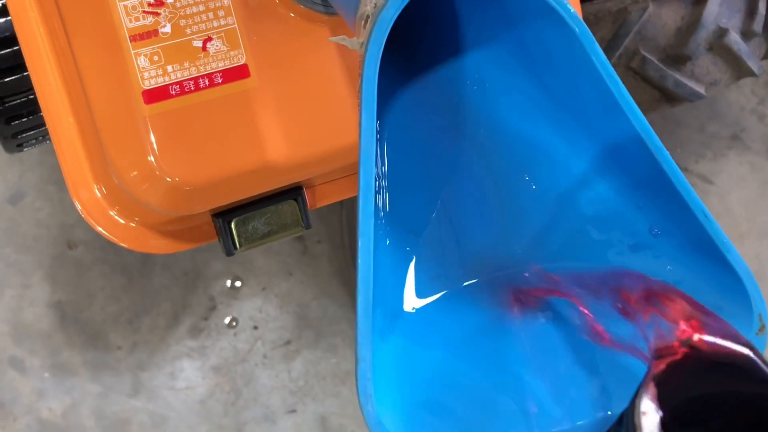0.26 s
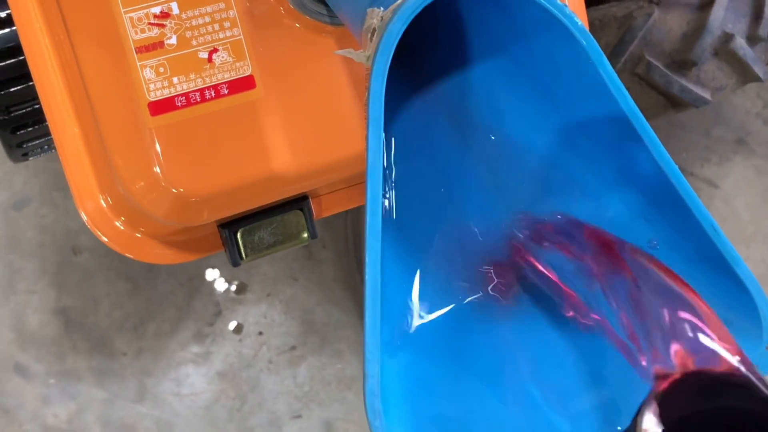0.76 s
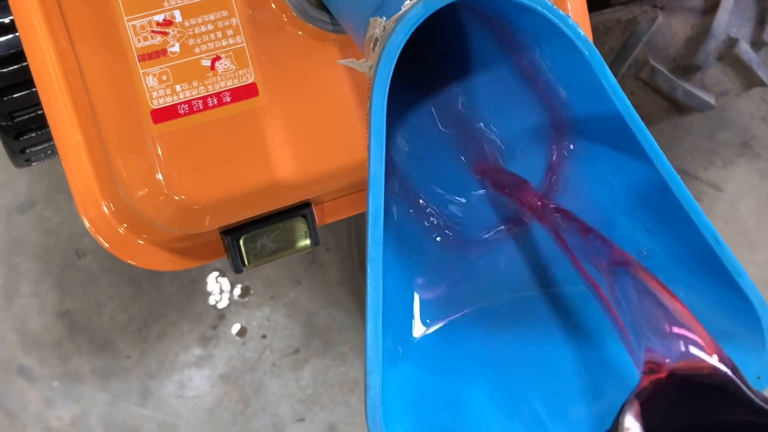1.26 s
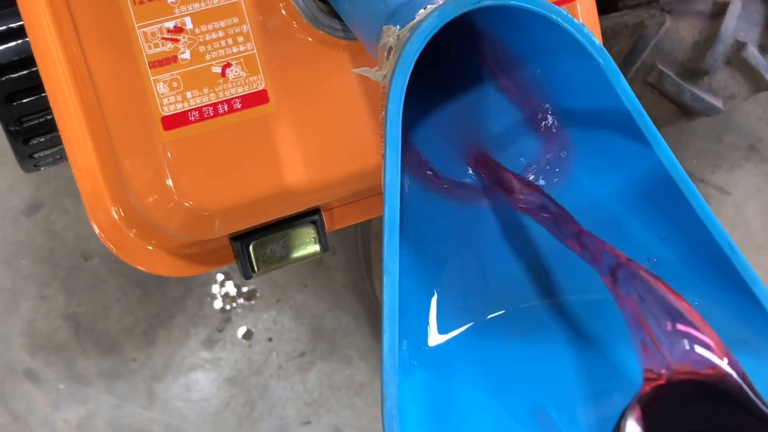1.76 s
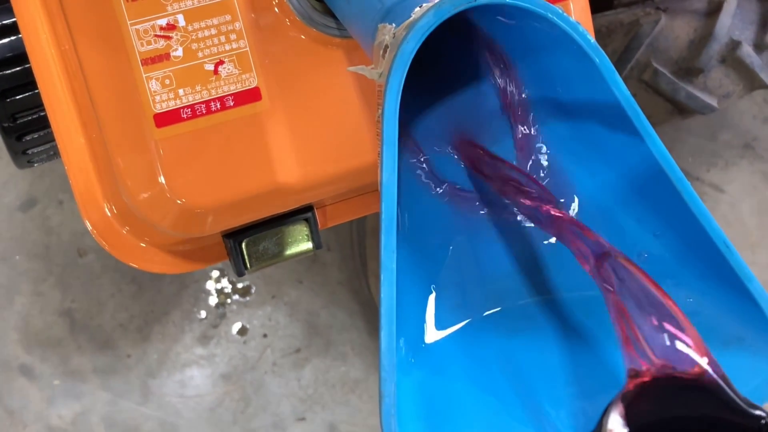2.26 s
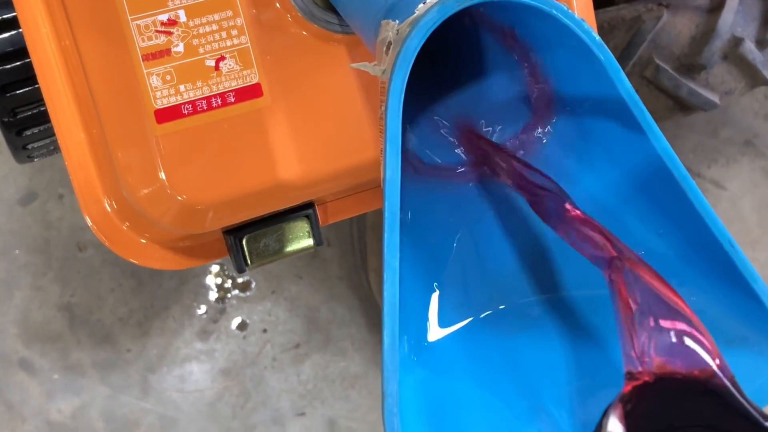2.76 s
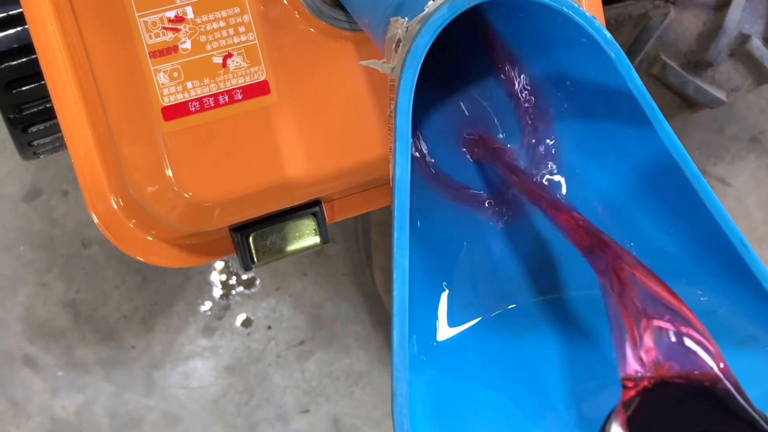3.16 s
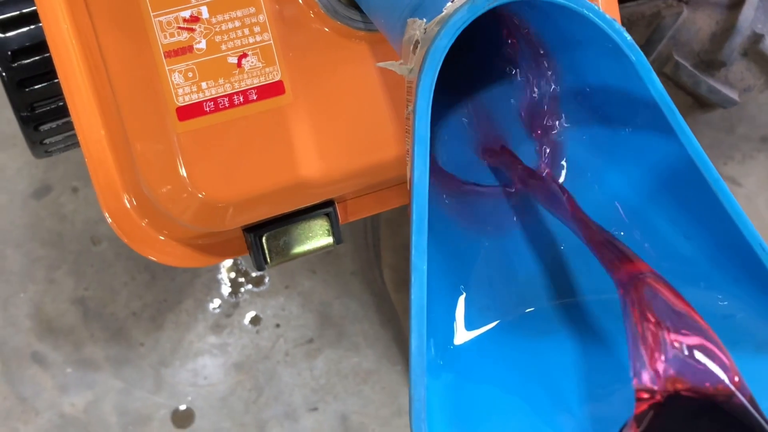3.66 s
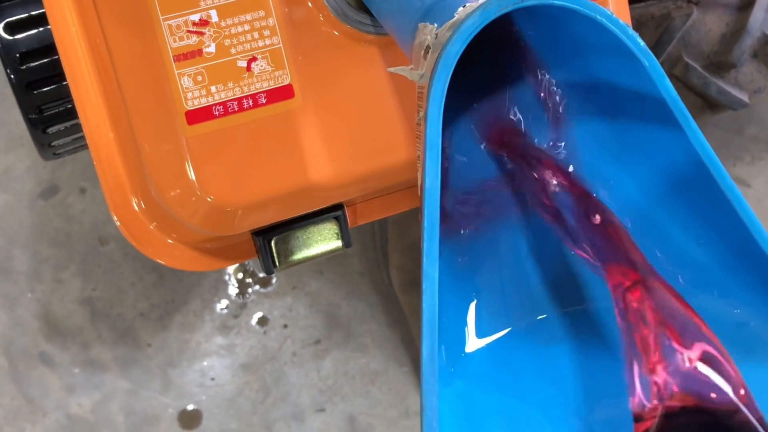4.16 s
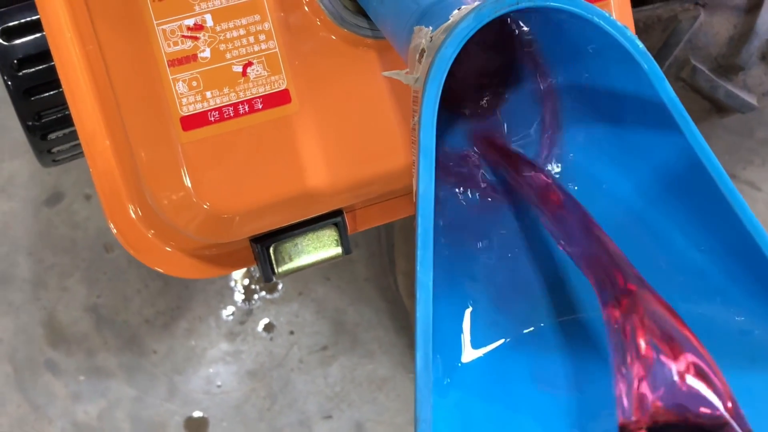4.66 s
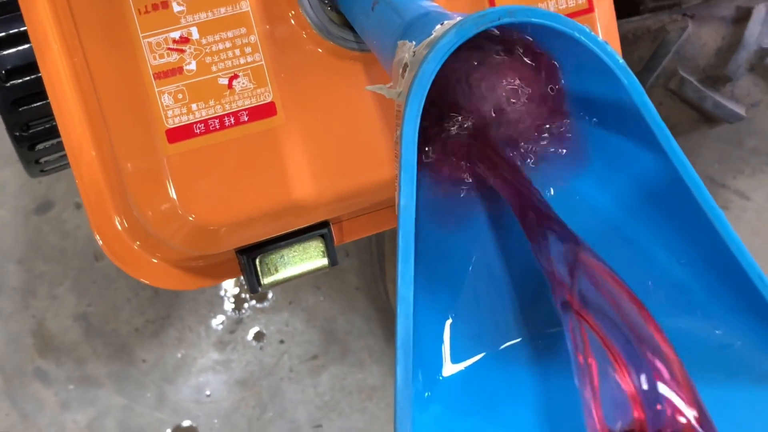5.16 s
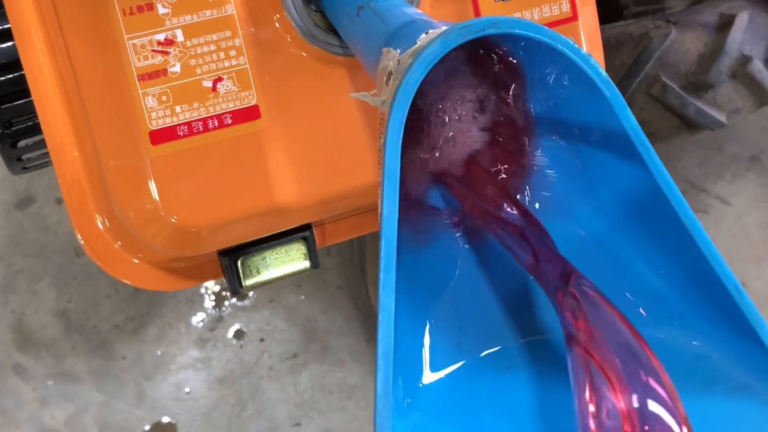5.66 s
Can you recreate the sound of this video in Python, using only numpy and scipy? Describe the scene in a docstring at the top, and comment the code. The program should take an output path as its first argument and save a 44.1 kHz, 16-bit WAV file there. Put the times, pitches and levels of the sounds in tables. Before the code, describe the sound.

Fuel is poured into a plastic funnel on an engine's tank, heard very close in a quiet workshop with a short, soft reverberation. At first there is only faint low room air, with tiny ticks and a weak spurt near 0.3 s, a small upward chirp of a drop around 0.5 s and another light spatter near 0.8 s. From about 1.1 s, separate gushes bring wet, hollow plops and gurgles, strongest from 1.6 to 3 s, the neck's resonance creeping upward, with sharp drops tapping plastic. Around 3.3 s the gushes merge into a continuous, brighter rush of fine splashes and bubbles, fullest until about 5 s, while the hollow ring fades. Then it softens unevenly into fizzing, crackling foam to the end at 5.9 s. Behind it, a low wavering engine-like hum swells from 3 s, peaks around 4.4 s with its pitch rising and falling, then eases.

```python
"""Fuel poured through a funnel

Fuel runs from a can into a plastic funnel on an engine's tank, close by, in a workshop.
A few small gushes come first; then the stream plops in the neck, thickens to a rush and ends in foam.
Trapped bubbles are decaying sines, droplets are noise ticks, and the cone, neck and tank filter them.
Behind, a low hum like an engine some way off swells as a wavering harmonic series, over still air."""
import sys
import numpy as np
from scipy import signal
from scipy.fft import rfft, irfft, next_fast_len
from scipy.io import wavfile
from scipy.ndimage import uniform_filter1d

SR = 44100
rng = np.random.default_rng(int(sys.argv[2]) if len(sys.argv) > 2 else 0)


def wav_record(signal):
    """Record a signal, one row per channel, as 16-bit PCM in the file named by sys.argv[1]."""
    frames = np.transpose(np.atleast_2d(signal))
    bounded = np.clip(frames, -1, 1)
    # unit amplitude maps onto the largest positive 16-bit level
    quanta = np.round(bounded * 32767).astype(np.int16)
    wavfile.write(sys.argv[1], SR, quanta)


N = 260554
TIME = np.arange(N) / SR

# the loudest air bubbles trapped by the stream: peak_s (moment when the bubble is loudest),
# level_db (relative), pitch_hz, ring_cycles (relative decay time, in periods)
BUBBLES = [(0.5986, -36, 7070, 16), (1.043, -41, 2330, 1.9), (1.1143, -32, 4100, 4.4),
           (1.1538, -39, 1550, 3.3), (1.173, -41.5, 1590, 4.5), (1.2925, -36.5, 3490, 4.7),
           (1.3575, -29.5, 4900, 7.8), (1.3857, -26.5, 1420, 2.8), (1.4404, -33.5, 1160, 3.4),
           (1.4458, -27, 1950, 1.8), (1.632, -29.5, 5470, 14), (1.634, -22.5, 2240, 2),
           (1.635, -23.5, 1150, 3.8), (1.6486, -31, 5500, 7.7), (1.681, -33, 1850, 1.8),
           (1.7111, -25, 1263, 6.5), (1.726, -28, 1930, 0.59), (1.7638, -25, 1286, 1.8),
           (1.834, -30.5, 4050, 14), (1.8473, -26.5, 1630, 1.76), (1.8644, -23.5, 4530, 0.96),
           (1.8678, -38, 1030, 5.7), (2.033, -25.5, 1970, 2.5), (2.0698, -21.5, 1666, 2.1),
           (2.0754, -25, 1335, 4.5), (2.101, -33.5, 4950, 5.5), (2.13, -33, 6330, 15),
           (2.162, -35, 10200, 6.5), (2.142, -29.5, 1490, 6.9), (2.235, -28, 1610, 6.4),
           (2.2933, -35.5, 1310, 3.3), (2.3085, -30, 1150, 2.6), (2.3236, -32.5, 5800, 8.1),
           (2.365, -28.5, 1074, 4.9), (2.453, -32.5, 3630, 2.8), (2.4728, -37, 1870, 1.2),
           (2.512, -36, 1540, 7.1), (2.539, -32, 1900, 3), (2.578, -27.5, 1310, 3.7),
           (2.7001, -24, 1830, 1.1), (2.7325, -31, 4000, 10), (2.7326, -28, 11800, 6.9),
           (2.7479, -24.5, 5100, 2.2), (2.7784, -31, 1370, 1.4), (2.8243, -29.5, 1550, 1.8),
           (2.9128, -21.5, 1140, 3.2), (2.9494, -21.5, 4430, 6.6), (2.9691, -23, 4420, 14),
           (2.981, -28, 4750, 11), (3.004, -30.5, 1214, 4.4), (3.026, -34, 4830, 6.1),
           (3.0847, -34, 4830, 4.4), (3.1309, -32, 5300, 7.6), (3.1847, -27.5, 1740, 5.4),
           (3.195, -26, 1410, 3.8), (3.26, -24.5, 2020, 1.3), (3.2768, -33, 1390, 3),
           (3.2966, -23.5, 7800, 4.5), (3.3142, -30.5, 1950, 1.7), (3.3803, -30.5, 4800, 21),
           (3.4219, -30, 1340, 4.7), (3.449, -34, 1580, 1.8), (3.504, -22.5, 1980, 1.4),
           (3.5338, -32, 1580, 1.5), (3.5508, -25, 1180, 1), (3.733, -29.5, 1240, 1.5),
           (3.766, -24.5, 11500, 2.3), (3.852, -31, 1920, 1.3), (3.877, -29, 10540, 20),
           (3.9229, -29, 8300, 14), (3.9613, -22.5, 1460, 3), (4.0005, -24, 4800, 2.4),
           (4.0477, -21.5, 1860, 4.2), (4.175, -36, 1400, 3.4), (4.2132, -28.5, 2030, 1.2),
           (4.2251, -30.5, 1500, 2.5), (4.276, -25.5, 1750, 0.83), (4.311, -27, 1580, 1),
           (4.332, -30.5, 1770, 4.1), (4.383, -28.5, 8400, 11), (4.4505, -38, 1800, 2),
           (4.5852, -23.5, 11580, 7.9), (4.6134, -25.5, 5130, 2.7), (4.8094, -27.5, 11310, 11),
           (4.849, -35.5, 1530, 3.6), (4.939, -29, 11740, 4.8), (4.9464, -30.5, 4196, 3.6),
           (5.0224, -31, 1850, 1.3), (5.0853, -28, 3550, 2.06), (5.119, -33.5, 1657, 1.8),
           (5.1763, -37.5, 5800, 8.8), (5.238, -37, 1500, 1.3), (5.365, -35, 1420, 1.9),
           (5.387, -29.5, 12300, 9.6), (5.39, -31, 1960, 0.99), (5.4547, -30, 5870, 5.6),
           (5.4911, -29.5, 1350, 1.3), (5.5433, -28.5, 5200, 0.88), (5.63, -35.5, 1860, 2.2)]
# how finely the stream breaks up: time_s, density (relative)
DENSITY = [(0, .7), (1.2, .8), (2.6, .8), (3.3, 1.1), (4.2, 2), (5, 2.2), (5.91, 2.4)]
# the air in the funnel's neck, which rings once fuel runs down it and is choked as the fuel
# backs up: time_s, resonance_hz (before its wavering), ring_db (relative)
NECK = [(0, 766, -12), (.9, 774, -6), (1.25, 812, 4), (1.65, 898, 7), (1.9, 948, 5), (2.9, 1010, 2),
        (3.8, 1040, -9), (4.8, 1047, -19), (5.91, 1070, -10)]


def amp(db):
    """Decibels to amplitude ratio."""
    return 10 ** (np.asarray(db) / 20)


def evened(x):
    """Normalizes a signal to an rms of 1."""
    return x / np.sqrt(np.mean(x ** 2) + 1e-20)


def curve(rows, axis=1):
    """Piecewise-linear interpolation of one table column over time."""
    rows = np.array(rows)
    return np.interp(TIME, rows[:, 0], rows[:, axis])


def read(points, hz):
    """Interpolates a spectrum linearly over log frequency."""
    f, value = np.transpose(points)
    return np.interp(np.log(hz + 1), np.log(f), value)


def add(mix, s, sound):
    """Superposes a sound on the mix at a time in seconds."""
    part = mix[max(round(s * SR), 0):][:len(sound)]
    part += sound[:len(part)]


def noise(points):
    """Stationary noise: a white spectrum weighted by the given one, at rms 1."""
    size = next_fast_len(N, True)
    white = rfft(rng.standard_normal(size))
    gain = amp(read(points, np.fft.rfftfreq(size, 1 / SR)))
    return evened(irfft(white * gain, size)[:N])


def drift(hz, size=8192):
    """Slow random fluctuation of rms 1: noise under a Gaussian low-pass."""
    low_pass = np.exp(-(np.fft.rfftfreq(size, N / SR / size) / hz) ** 2)
    slow = irfft(rfft(rng.standard_normal(size)) * low_pass, size)
    return evened(np.interp(TIME, np.linspace(0, N / SR, size), slow))


def colour(x, points, size=2048):
    """Minimum-phase filtering: the Hilbert relation makes each click ring only after it."""
    log_gain = np.log(amp(read(points, abs(np.fft.fftfreq(size, 1 / SR)))))
    impulse = np.fft.ifft(np.exp(np.conj(signal.hilbert(log_gain)))).real
    return signal.oaconvolve(x, impulse[:size // 2])[:N]


def resonate(x, hz, width):
    """A moving resonance of gain 1: heterodyne to zero, one-pole low-pass, and back."""
    turn = np.exp(2j * np.pi * np.cumsum(hz) / SR)
    r = np.exp(-np.pi * width / SR)
    return 2 * (turn * signal.lfilter([1 - r], [1, -r], x / turn + 1e-18)).real


def ring(x, hz, width):
    """A fixed two-pole resonance of gain 1."""
    hz, width = min(hz, .42 * SR), min(width, SR / 4)
    return signal.lfilter(*signal.iirpeak(hz, hz / width, fs=SR), x)


def still_air(level_db=-56.5):
    """Room tone: stationary noise with most of its power at low frequencies."""
    # the workshop at rest: frequency_hz, density_db (per Hz, relative)
    air_spectrum = [(15, -61), (25, -52), (45, -1), (102, -2.5), (206, -5.5), (263, -11), (363, -14.5),
                    (641, -24), (1200, -27), (1440, -23.5), (2000, -33.5), (4300, -41), (5100, -34),
                    (6200, -41.5), (11000, -45.5), (13300, -40), (16000, -40)]
    return amp(level_db) * noise(air_spectrum)


def engine(waver=0.014, flutter_db=3.0, load=0.91, rumble_db=-4):
    """A frequency-modulated harmonic series whose overtones grow with load, over a rumble."""
    # the distant engine: time_s, firing_hz (before its wavering), level_db (relative)
    course = [(0, 48.3, -70), (2.5, 47, -70), (2.95, 47.75, -60), (3.25, 51.7, -55), (3.48, 58, -49),
              (3.75, 60.63, -53), (3.97, 50.7, -51.5), (4.2, 55.4, -51.5), (4.38, 57.38, -46),
              (4.76, 57.7, -48), (5, 55.04, -50.5), (5.3, 48.37, -51), (5.91, 49.1, -55)]
    # its harmonics under load: multiple (of firing rate), level_db (relative)
    orders = [(1, 1), (2, 2), (3, -11.5), (4, -8), (5, -16.5)]
    # the engine's rumble: frequency_hz, density_db (per Hz, relative)
    rumble_spectrum = [(15, -52), (26, -32), (42, 2), (95, 1), (140, -9), (220, -3.5), (330, -15.5),
                       (600, -14.5), (1200, -14), (4000, -68)]
    turns = np.cumsum(curve(course) * (1 + waver * drift(8.4))) / SR
    level = curve(course, axis=2)
    overtones_db = load * (level - level.max())
    hum = np.zeros(N)
    for k, db in orders:
        order_db = db + (k > 1) * overtones_db + flutter_db * drift(18.5)
        hum += amp(order_db) * np.sin(2 * np.pi * (k * turns + rng.random()))
    return amp(level) * (hum + amp(rumble_db) * noise(rumble_spectrum))


def workshop(x, wall_db=-17, wall_s=0.0021, room_db=-19):
    """Early reflections inside the cone, then the room's frequency-dependent reverberant decay."""
    # ring of the room: frequency_hz, t60_s
    reverberation = [(300, 1), (1500, 0.35), (5000, 0.34), (15000, 0.35)]
    t = TIME[:SR // 2]
    # sparse random echoes of either sign
    near, far = rng.choice([-1., 1.], (2, len(t))) * (rng.random((2, len(t))) < .1)
    near *= np.exp(-t / wall_s) * (t > .001)
    hz, age, z = signal.stft(far * (t > .006), SR, nperseg=256)
    decay = amp(-60 * age / read(reverberation, hz)[:, None])
    tail = signal.istft(z * decay, SR, nperseg=256)[1][:len(t)]
    echoes = amp(wall_db) * near / np.linalg.norm(near) + amp(room_db) * tail / np.linalg.norm(tail)
    return x + signal.oaconvolve(x, echoes)[:N]


def tank(wet, cavity_hz=420, level_db=-4):
    """Cavity resonance: fuel falling inside stirs the tank's hollow in step with the splashing."""
    strength = np.sqrt(abs(uniform_filter1d(wet ** 2, size=900)) + 1e-16)
    stirred = strength * rng.standard_normal(N)
    return amp(level_db) * ring(ring(stirred, cavity_hz, 85), cavity_hz, 180)


def neck(wet):
    """Sympathetic resonance of the neck's air; swirling fuel alters the gap, and so the pitch."""
    hz = curve(NECK) * (1 + 0.031 * drift(10))
    return amp(curve(NECK, axis=2)) * resonate(resonate(wet, hz, 61), hz, 420)


def first_run(start_s=0.94, end_s=1.235, level_db=-68, waver=0.0196):
    """The first fuel down the neck makes its air sing: a faint tone wavering in pitch and level."""
    swell = np.sin(np.pi * np.clip((TIME - start_s) / (end_s - start_s), 0, 1))
    turns = np.cumsum(curve(NECK) * (1 + waver * drift(44))) / SR
    return amp(level_db) * swell * (1 + .5 * drift(40)) * np.sin(2 * np.pi * turns)


def lumps(rough_db=5.5, quick_db=1.0, burst=0.38, settle_s=0.021):
    """Amplitude modulation by a lumpy stream, evener as it thickens; plops add decaying bursts."""
    s, db = np.transpose(BUBBLES)[:2]
    kicks = np.bincount((s * SR).astype(int), amp(db - db.max()), N)
    thrown = signal.lfilter([1], [1, -np.exp(-1 / (settle_s * SR))], kicks)
    uneven_db = rough_db * drift(73) + quick_db * drift(160)
    uneven_db = uneven_db / np.sqrt(np.maximum(curve(DENSITY), .3))
    return amp(uneven_db) * (1 + burst * np.sqrt(thrown))


def impacts(per_s=330, spread_db=4.5, smear_s=0.00022):
    """Droplets strike plastic as a random point process of wide-band ticks, very unequal in size."""
    chance, size, grit = rng.random(N), rng.random(N), rng.standard_normal(N)
    hits = (chance < per_s * curve(DENSITY) / SR) * amp(-spread_db * np.log(size + 0.071))
    envelope = signal.lfilter([1], [1, -np.exp(-1 / (smear_s * SR))], hits)
    return evened(grit * envelope)


def froth(lump, ticks):
    """Tiny foam bubbles merge statistically into a crackle of ticks and a fizz of filtered noise."""
    # froth heaping up in the cone: time_s, level_db (relative)
    heap = [(0, -110), (3, -59.5), (3.8, -55.5), (4.4, -51), (5, -54.5), (5.5, -52), (5.91, -58)]
    # its colour: frequency_hz, density_db (per Hz, relative)
    fizz_colour = [(200, -32), (500, -7.5), (680, 2), (850, 5), (1300, 12), (1700, 13.5), (2200, 8),
                   (3050, 10), (3600, 4), (5900, 1), (8000, -1.5), (16000, -25)]
    crackle = np.sqrt(lump) * (ticks + 1.1 * rng.standard_normal(N))
    return amp(curve(heap)) * evened(colour(crackle, fizz_colour))


def surges(sway_db=-1.5, sway_hz=30):
    """Random sway of flow in dB: a thin stream wobbles, a thick one runs more steadily."""
    return sway_db * drift(sway_hz) / np.maximum(curve(DENSITY), .5)


def gushes(gurgle_share):
    """Trapezoidal envelopes: each gush lands quickly, holds and drains away."""
    # separate gushes from the can while the stream is thin: start_s, length_s,
    # level_db (relative), gurgle_db (gurgle's added level)
    gush_rows = [(0.285, 0.099, -76, 1), (0.467, 0.05, -60, -2), (0.751, 0.12, -63, -4),
                 (0.932, .1, -70.5, -3), (1.07, 0.16, -59.5, -2), (1.348, 0.13, -53.5, 4),
                 (1.569, 0.26, -55, -6), (1.826, 0.049, -58, 6), (1.939, 0.046, -54, -1),
                 (2.002, 0.2, -51.5, 4.5), (2.23, 0.18, -55, 4), (2.419, .13, -55.5, 2),
                 (2.663, 0.24, -52, 2), (2.901, 0.12, -52, 7)]
    attack_s, release_s = 0.0041, 0.027
    total = np.zeros(N)
    for s, length, db, gurgle_db in gush_rows:
        ramp = np.minimum((TIME - s) / attack_s, (s + length - TIME) / release_s)
        total += amp(db + gurgle_share * gurgle_db) * np.clip(ramp, 0, 1)
    return total


def splashes(centre_hz):
    """Power sum of splashes that rise before and decay after bubbles, greatest for like pitch."""
    lead_s, settle_s, width_octaves = 0.0045, 0.012, 1.0
    power, age = np.zeros(N), TIME[:SR // 4] - TIME[SR // 20]
    shape = np.exp(-np.maximum(-age / lead_s, age / settle_s))
    for s, db, hz, _ in BUBBLES:
        likeness = 1 / (1 + (np.log2(hz / centre_hz) / width_octaves) ** 4)
        add(power, s + age[0], amp(db) ** 2 * shape * likeness)
    return np.sqrt(power)


def pour(surge, centre_hz, flow_db, thick_db, gush_db, splash_db, gurgles=False):
    """Level in dB of one spatter size: an energy sum of stream, gushes and splashes."""
    # strength of the unbroken stream: time_s, level_db (relative)
    flow = [(1.3, -92), (1.55, -62), (2.0, -64), (2.62, -66), (2.95, -61), (3.11, -58), (3.28, -52),
            (3.54, -48), (3.66, -55), (3.8, -51.5), (4.3, -48), (4.7, -54), (4.96, -52), (5.15, -64),
            (5.45, -55), (5.72, -63.5), (5.91, -59.5)]
    # thick_db is the gain as the stream thickens
    steady = amp(curve(flow) + surge + flow_db + thick_db * (curve(DENSITY) - 1))
    gushing = amp(gush_db) * gushes(gurgles)
    splashing = amp(splash_db) * splashes(centre_hz)
    return 10 * np.log10(steady ** 2 + gushing ** 2 + splashing ** 2 + 1e-14)


def slap(hz, breadth, decay_s, size=700):
    """A wet smack: decaying noise through two equal resonances, scaled to peak 1."""
    burst = rng.standard_normal(size) * np.exp(-TIME[:size] / decay_s)
    burst = ring(ring(burst, hz, breadth * hz), hz, breadth * hz)
    return burst / abs(burst).max()


def taps():
    """Impact of single drops on hard plastic: brief band-limited noise bursts."""
    # single drops that strike hard: start_s, level_db (peak, before the cone), centre_hz
    tap_rows = [(.2995, -39.5, 13600), (.337, -50, 9000), (.761, -43, 3500), (.772, -38, 11000),
                (.7875, -42, 13000), (.7995, -35, 14000), (1.0993, -32, 4830), (1.1739, -30, 5930),
                (1.445, -25.5, 6850), (1.4758, -33, 4900), (1.833, -22.5, 14500), (2.131, -24, 15000),
                (2.267, -25.5, 6790), (2.3634, -33, 4500), (2.4732, -27, 4050), (2.5127, -26, 12760),
                (2.5259, -22, 4500), (2.5687, -34, 14000), (2.6992, -25.5, 12700), (2.901, -20, 3120),
                (3.5118, -22.5, 9700), (3.546, -31, 12160), (3.7448, -26.5, 9200), (3.823, -25, 12740),
                (4.2313, -23.5, 4800), (4.551, -24.5, 10220), (4.839, -24.5, 5100), (4.929, -24.5, 5810),
                (5.3908, -28, 3610), (5.4778, -39, 9000), (5.7768, -32.5, 5810)]
    out = np.zeros(N)
    for s, db, hz in tap_rows:
        add(out, s, amp(db) * slap(hz, breadth=0.55, decay_s=0.0006))
    return out


def chirps():
    """A drop's bubble rises to the surface, its pitch climbing exponentially under a smooth swell."""
    # start_s, level_db (before the cone), pitch_hz (at the start), rise (octaves per s), length_s
    chirp_rows = [(0.4796, -34, 1960, 183, 0.012), (.5042, -45.5, 8100, 200, 0.0048)]
    out = np.zeros(N)
    for s, db, hz, octaves, length in chirp_rows:
        t = TIME[:int(length * SR)]
        swell = np.sin(np.pi * (t / length) ** 0.46) ** 2
        turns = np.cumsum(hz * 2 ** (octaves * t)) / SR
        add(out, s, amp(db) * swell * np.sin(2 * np.pi * turns))
    return out


def glugs(level_db=-15, fall_s=0.0225, decay_s=0.0091, swell_s=0.0054, largest_hz=2100, open_share=0.7):
    """Large bubbles leave soft tails gliding to the neck's resonance, weaker as the neck is choked."""
    out, t = np.zeros(N), TIME[:SR // 12]
    neck_hz, ring_db = curve(NECK), curve(NECK, axis=2)
    for s, db, hz, _ in BUBBLES:
        phase, at = rng.random(), int(s * SR)
        if hz < largest_hz:  # low pitch means a large bubble
            turns = np.cumsum(neck_hz[at] + (hz - neck_hz[at]) * np.exp(-t / fall_s)) / SR
            shape = (1 - np.exp(-t / swell_s)) * np.exp(-t / decay_s)
            gain = amp(db + level_db + open_share * min(ring_db[at], 0))
            add(out, s, gain * shape * np.sin(2 * np.pi * (turns + phase)))
    return out


def bubble(hz, cycles, glide, rise=.9, size=700):
    """A pulsating air pocket: a damped sine of sliding pitch; gives the sound and its envelope."""
    age = np.arange(size) * hz / SR  # in cycles
    shape = (1 - np.exp(-(age / rise) ** 2)) * np.exp(-age / cycles)
    shape /= shape.max()
    slide = np.exp(glide * np.tanh((age - 2 * rise) / (2 * cycles)))
    turns = np.cumsum(hz * slide) / SR
    return shape * np.sin(2 * np.pi * (turns + rng.random())), shape


def plops(sustain=0.94, lift=-0.021, scatter=0.2, slap_db=-8, level_db=1.67, tick_db=-10, tick_hz=5200):
    """Bubbles ring as damped oscillators, opening with a wet smack and the tick of the drop."""
    out = np.zeros(N)
    for s, db, hz, cycles in BUBBLES:
        tone, shape = bubble(hz, max(sustain * cycles, 1), lift + scatter * rng.standard_normal())
        smack = amp(slap_db) * slap(0.96 * hz, breadth=1.28, decay_s=0.0018)
        tick = amp(tick_db) * slap(tick_hz, breadth=0.75, decay_s=0.0006)
        # start early enough for the bubble's envelope to peak at peak_s
        add(out, s - shape.argmax() / SR, amp(db + level_db) * (tone + smack + tick))
    # the narrow neck radiates little below its own pitch
    return signal.sosfilt(signal.butter(4, 760, "high", fs=SR, output="sos"), out)


def spatter(level, lump, ticks, low_hz, high_hz, cycles, spread_db, tick_db, wash_db, count):
    """Superposed small bubbles of one size class, droplet ticks and wash, levelled to the pour."""
    # colour of the funnel's cone: frequency_hz, gain_db
    cone_colour = [(300, -34), (700, 9), (1030, 4), (1600, 2.5), (2400, 3), (3100, -9.5), (4100, -2),
                   (5100, -0.5), (6500, -8.5), (7700, -1), (9000, -3.5), (11300, 1.5), (13000, -1),
                   (16000, -4.5)]
    so_far, out = np.cumsum(np.maximum(curve(DENSITY), .05)), np.zeros(N)
    # jittered order numbers, spread out in time by the density
    places = (np.arange(count) + 2 * rng.random(count)) / (count + 2)
    times = np.searchsorted(so_far, so_far[-1] * places) / SR
    for s, (pitch, size, slide) in zip(times, rng.random((count, 3))):
        hz = low_hz * (high_hz / low_hz) ** pitch
        tone, _ = bubble(hz, cycles, slide * 0.432 - .2, size=600)
        add(out, s, amp(-spread_db * np.log(size + 0.021)) * tone)
    band = signal.butter(3, [low_hz, high_hz], "band", fs=SR, output="sos")
    hiss = signal.sosfilt(band, ticks + amp(wash_db) * rng.standard_normal(N))
    out = colour(lump * (evened(out) + amp(tick_db) * evened(hiss)), cone_colour)
    # divide out the running rms, so that level alone sets the strength
    power = uniform_filter1d(uniform_filter1d(out ** 2, size=2600), size=1600)
    return amp(level) * out / np.sqrt(abs(power) + 1e-12)


def stream():
    """Source and filter: bubbles, drops and froth excite the cone, the neck and the tank."""
    # pitches that cancel inside the cone: frequency_hz, width_hz, depth (0-1)
    notches = [(2050, 160, 0.41), (2910, 225, 0.61), (4487, 260, 0.5), (6340, 190, 0.79),
               (10300, 1500, 0.28), (12300, 720, 0.62)]
    lump, ticks, surge = lumps(), impacts(), surges()
    large = pour(surge, centre_hz=1450, flow_db=5.0, thick_db=-7.0, gush_db=1.5, splash_db=-19.5,
                 gurgles=True)
    medium = pour(surge, centre_hz=4840, flow_db=1.0, thick_db=2.6, gush_db=3, splash_db=-20.5)
    fine = pour(surge, centre_hz=10500, flow_db=-3.0, thick_db=5.0, gush_db=-1.5, splash_db=-21)
    # foam closes over the pool and smothers the finest spray
    foam_from_s, foam_closing_s, foam_db = 4.9, .5, -3
    fine = fine + foam_db * np.clip((TIME - foam_from_s) / foam_closing_s, 0, 1)
    gurgle = spatter(large, lump, ticks, 1008, 2830, cycles=3.8, spread_db=4.0,
                     tick_db=-5, wash_db=-7, count=1300)
    splash = spatter(medium, lump, ticks, 3080, 7200, cycles=8.2, spread_db=4.5,
                     tick_db=-1, wash_db=-12.5, count=1400)
    spray = spatter(fine, lump, ticks, 6870, 16340, cycles=12.0, spread_db=5.0,
                    tick_db=-2.5, wash_db=-10, count=1500)
    wet = plops() + glugs() + taps() + chirps() + gurgle + splash + spray + froth(lump, ticks)
    hollows = neck(wet) + tank(wet) + first_run()
    for hz, width, depth in notches:
        wet = wet - depth * ring(wet, hz, width)
    return wet + hollows


def scene():
    """Linear superposition of the pour with its echoes, the engine and the still air."""
    return (workshop(stream()) + engine() + still_air())[None]


def record(dry):
    """Band limitation by a linear-phase low-pass."""
    edge_hz = 16100
    low_pass = signal.firwin(401, edge_hz, window=("kaiser", 8), fs=SR)
    return signal.oaconvolve(dry, low_pass[None], "same")


dry = scene()
out = record(dry)
wav_record(out)
```